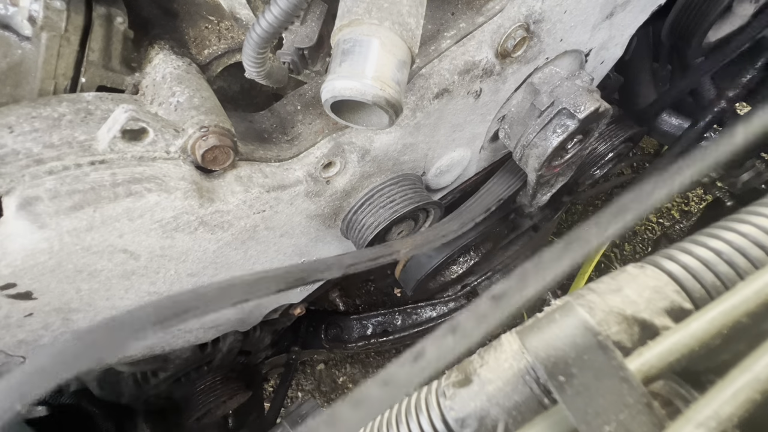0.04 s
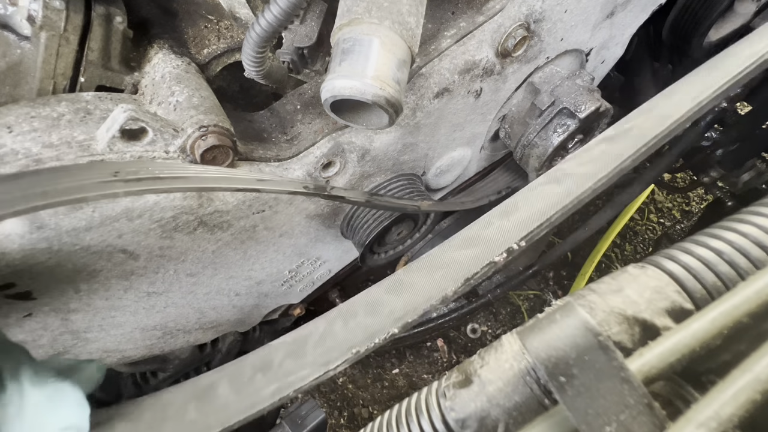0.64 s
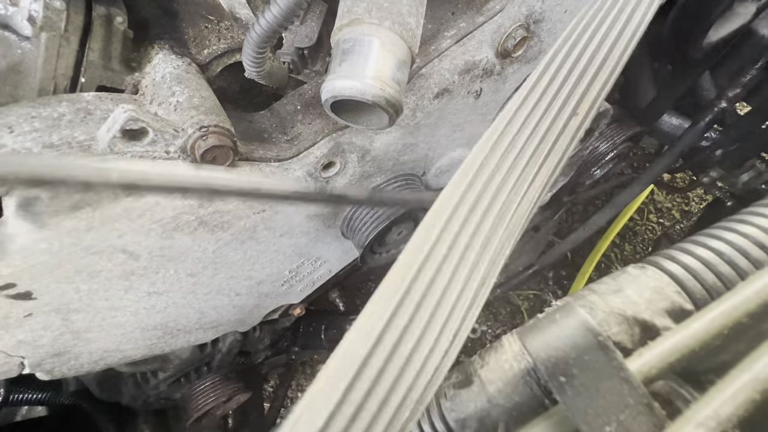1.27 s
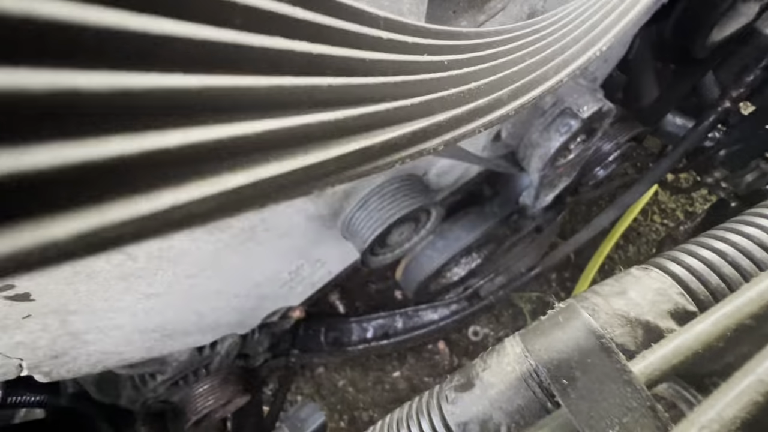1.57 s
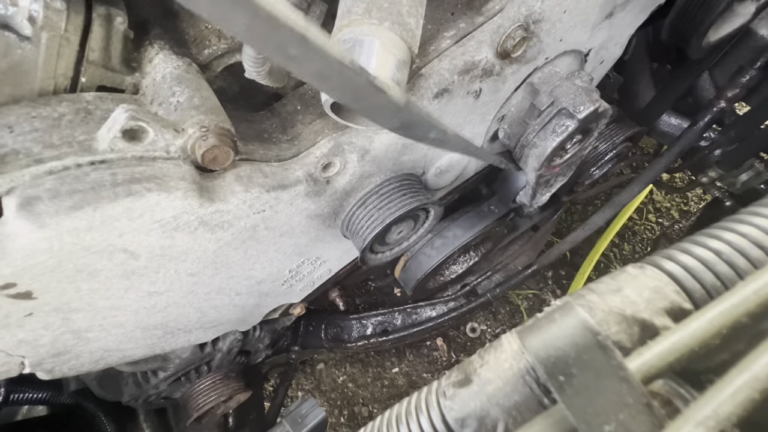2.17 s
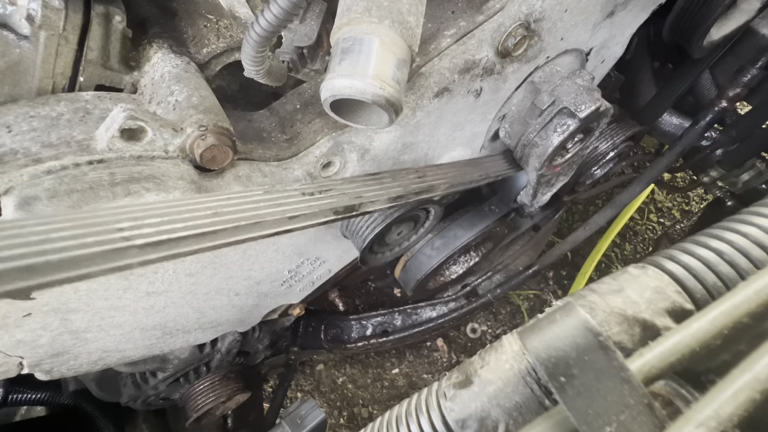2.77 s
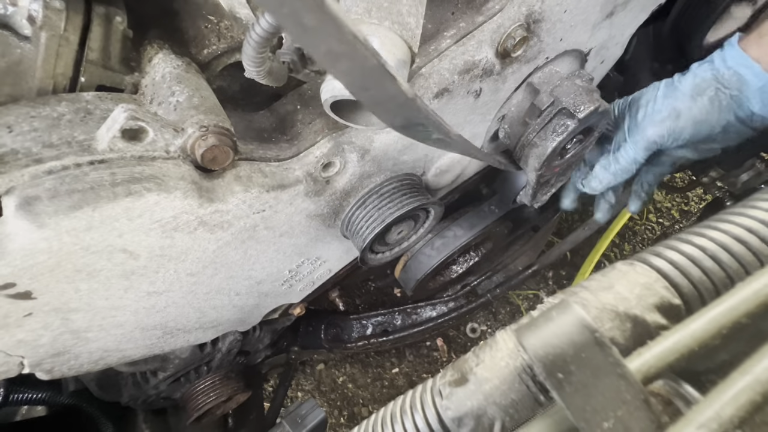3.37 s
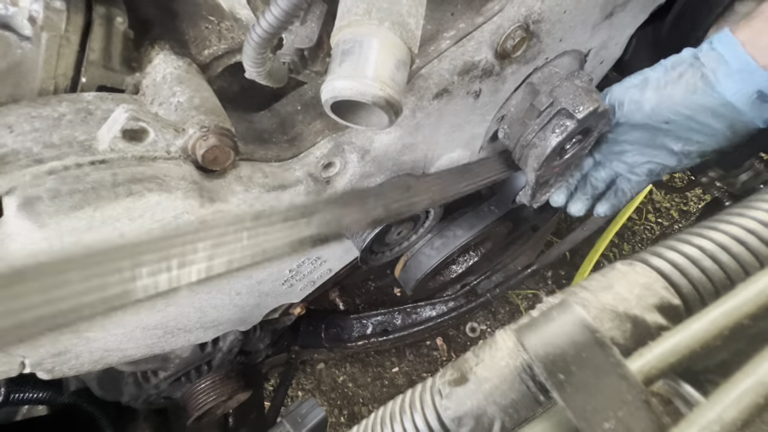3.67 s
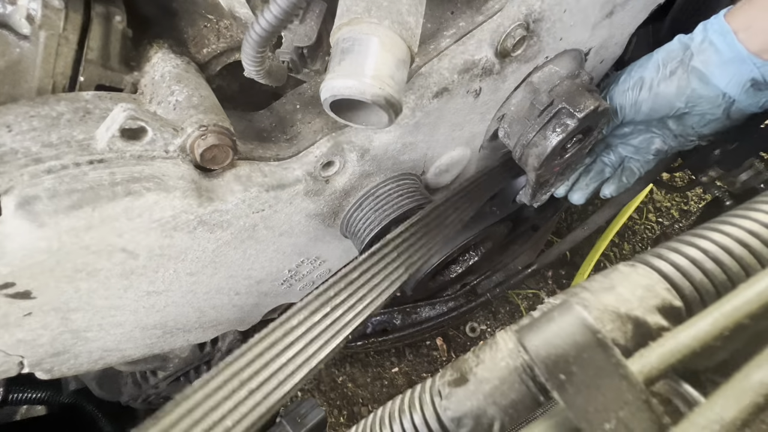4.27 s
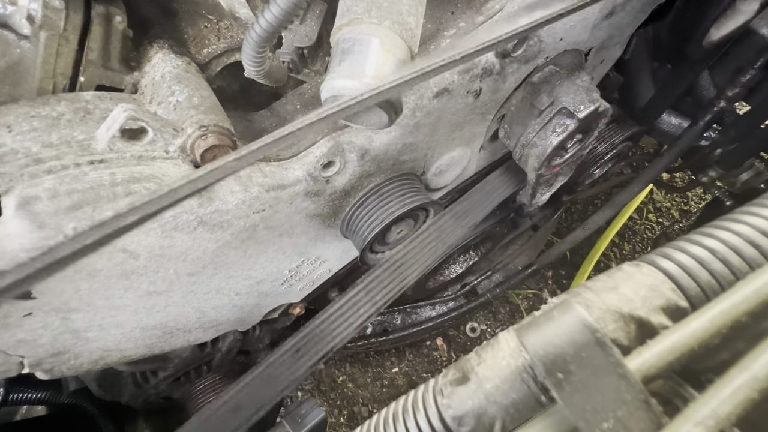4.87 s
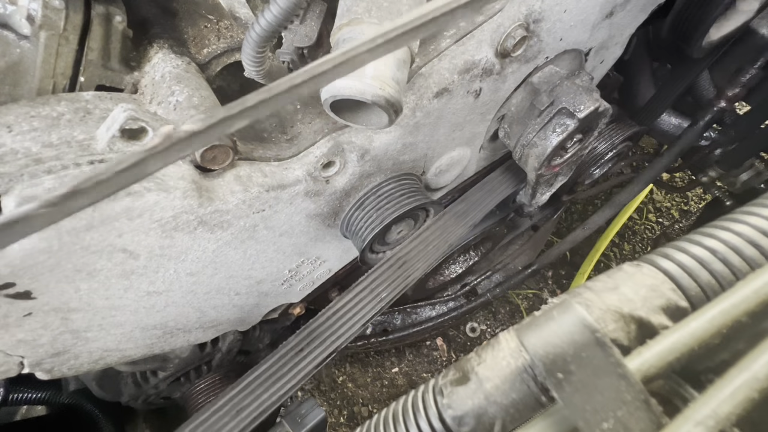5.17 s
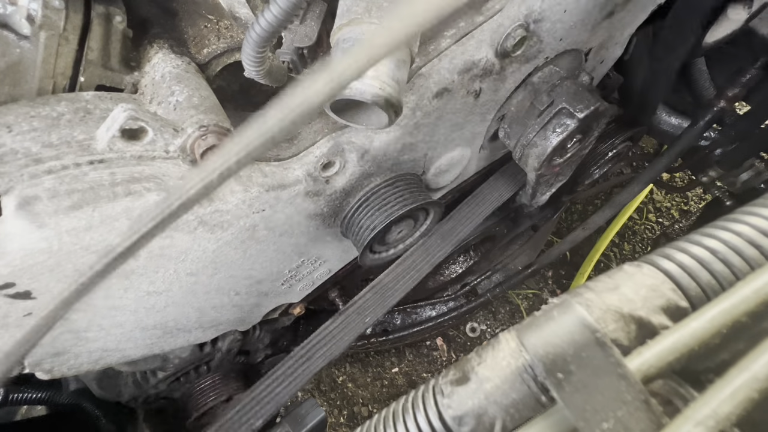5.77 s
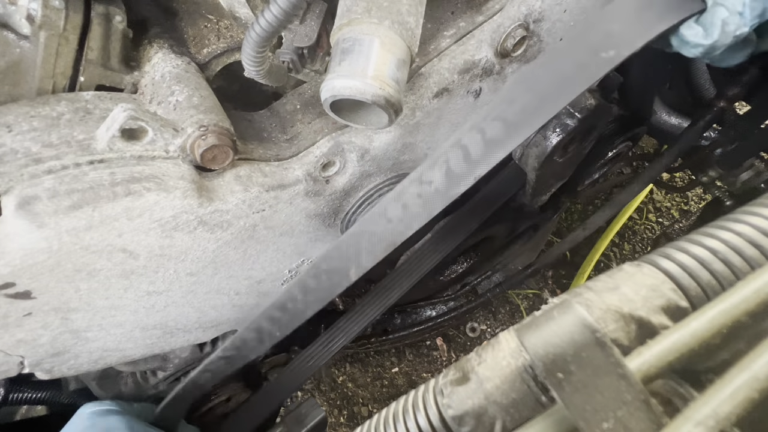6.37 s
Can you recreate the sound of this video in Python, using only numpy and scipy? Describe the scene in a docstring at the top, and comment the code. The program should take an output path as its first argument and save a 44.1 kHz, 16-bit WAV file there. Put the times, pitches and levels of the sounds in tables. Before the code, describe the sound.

Close rustling and scraping of a rubber belt handled by a gloved hand, with scattered flaps and ticks against engine metal.

```python
"""Threading a rubber belt

A gloved hand threads a ribbed rubber belt over the pulleys of a stopped engine, close to a phone
in a garage. The loose length of belt slaps and swings briefly and knocks a pulley. Its ribs tick
over metal edges, and the rubber scrapes and squeaks as it sticks and slips. Under it all lie
the rumble of handling, the rustle of the glove and a faint room hum with hiss."""
import sys
import numpy as np
from scipy import signal
from scipy.fft import rfft, irfft, next_fast_len
from scipy.io import wavfile
from scipy.ndimage import uniform_filter1d

SR = 44100
rng = np.random.default_rng(int(sys.argv[2]) if len(sys.argv) > 2 else 0)


def unload_wav(signal):
    """Save mono or channel-first audio to the path in sys.argv[1] as 16-bit WAV at rate SR, clipped to [-1, 1]."""
    wavfile.write(
        sys.argv[1],
        SR,
        np.round(np.clip(np.atleast_2d(signal).T, -1, 1) * 32767).astype(np.int16),
    )


N = 283563
TIME = np.arange(N) / SR
FFT_SIZE = next_fast_len(N, True)
FREQS = np.fft.rfftfreq(FFT_SIZE, 1 / SR) + 1e-3

# Levels compare rows within a table. A ring time (t60) is the time to fade by 60 dB.
# A phase gap is how far a wave is out of step between the left and right microphones.
# slaps of the belt: (time [s], level [dB], pitch about 4 ms in [Hz], steepness of the pitch fall,
# phase gap [rad], left minus right [dB])
SLAPS = [(1.005, -28.5, 432, 0.058, 2, 2.5), (1.196, -46, 412, 0.34, 2, 2),
         (1.403, -23.5, 433, 0.59, 3, -0.5), (1.57, -28, 542, 0.51, 3.5, 0),
         (1.5757, -28, 295, 0.41, 4, -3.5), (1.6474, -36.5, 353, 1, 2.5, -2.5),
         (3.112, -42.5, 434, 0.42, 1.58, -2), (3.252, -52, 395, 0.35, 2, 0), (3.317, -51, 423, 0.65, 1, -5),
         (3.36, -45.5, 594, .3, 4, -2), (3.411, -49, 450, 0.099, 3, 5),
         (4.1141, -23.5, 440, 0.99, -2.5, 1.5)]
# swings of the loose belt: (time [s], length [s], level [dB], lower note [Hz], upper note [Hz],
# upper over lower [dB], phase gap of the lower note [rad])
SWINGS = [(0.692, 0.015, -49.5, 352, 488, -12, 1), (0.777, 0.027, -54, 266, 387, -3, 0.5),
          (0.99, 0.021, -30.5, 418, 604, -14, 2), (1.01, 0.01, -36.5, 250, 410, 7, -1.5),
          (1.021, 0.03, -31, 252, 417, -4, -1.1), (1.05, 0.019, -41.5, 211, 433, 3, 1),
          (1.073, 0.031, -45, 197, 367, 5.5, 0.5), (1.194, 0.023, -44, 255, 404, 5.5, 0.5),
          (1.402, 0.044, -30, 158, 385, -4, .5), (1.411, 0.034, -27.5, 226.5, 470, -13, 2.5),
          (1.45, 0.023, -41.5, 180, 308, -1, 1.5), (1.571, 0.032, -29, 185.4, 388, -9, 1.2),
          (1.647, 0.023, -30, 168, 244, -21, 0.6), (1.796, 0.0174, -36, 280, 430, -3.5, -1.6),
          (3.108, 0.029, -43.5, 266, 430, -10, 0.7), (3.283, .016, -48, 315, 480, -10, 1),
          (3.363, .024, -40, 257, 647, -5, 1), (4.129, 0.013, -28.5, 268, 443, -10, -1.1),
          (4.164, 0.016, -38, 169, 419, 4, 2.2), (4.177, 0.018, -33.5, 247, 407, -11, -1.7),
          (4.378, 0.031, -36.5, 264, 405, -2, 0.7), (4.415, 0.015, -35.5, 400, 530, -4.5, -2.5),
          (4.432, .016, -28, 440, 562, -8.5, -3), (4.443, 0.028, -38.5, 418, 587, -3, -3),
          (5.384, .028, -55, 310, 403, -4, 1), (6.009, 0.027, -47.5, 265, 415, -12, 1)]
# knocks on a pulley: (time [s], level [dB], centre of the blow [Hz], pitch factor, ring time factor)
KNOCKS = [(1.305, -44, 850, 0.95, 0.98), (2.114, -35.5, 900, 1.06, 0.5), (3.128, -41, 1400, 1, 0.76),
          (3.37, -44, 1100, 0.92, 0.55), (3.404, -38, 800, 1.015, 1.22), (3.738, -25, 371, 0.98, 0.68),
          (3.8179, -28, 420, 0.99, 0.8), (3.935, -41, 850, 0.97, 0.93), (4.449, -34, 700, 1.15, 0.34),
          (4.462, -37, 1000, 1.01, 1.1), (4.9, -55, 1080, 0.96, .5), (5.08, -60, 990, 1.2, 0.6),
          (5.465, -65, 450, 0.81, .4), (5.927, -36, 1000, 0.94, 0.57), (5.943, -31.5, 830, 0.98, 0.67),
          (6.01, -41, 900, 0.91, .4), (6.068, -42, 790, 0.91, 0.59), (6.24, -50, 590, 1.26, 0.34)]
# natural notes of the pulley and its bracket: (pitch [Hz], level [dB], ring time [s], phase gap [rad])
PULLEY_NOTES = [(258, -27, 0.083, -5), (479, -4, 0.16, 1.26), (556, 9.5, 0.008, -1.5),
                (657, -21, 0.51, 3.5), (797, -7, 0.14, 7.5), (821, -14.5, 0.4, 6), (880, -21.5, 0.45, 1.4),
                (1048, -6.5, 0.051, 5), (1390, -16, 0.08, 2.5), (1710, -22, 0.08, 6.5),
                (5440, -7, 0.025, -2)]
# flicks of small metal edges: (time [s], level [dB], pitch [Hz], ring time [s])
PINGS = [(0.754, -39, 2560, 0.009), (3.256, -35.5, 5620, 0.0086), (3.8155, -22.5, 5580, 0.0086),
         (4.0204, -28.5, 3950, 0.018), (4.1152, -8.5, 2830, 0.0086), (5.552, -41, 5300, 0.01),
         (5.617, -41, 6800, 0.011)]
# squeaks of rubber: (time [s], length [s], level [dB], pitch [Hz])
SQUEAKS = [(1.736, 0.0095, -39, 2140), (1.762, 0.013, -45, 2040), (1.779, 0.016, -38, 1950),
           (1.777, .014, -42, 4300), (1.785, 0.014, -44, 3050), (4.414, 0.031, -44.5, 2650),
           (4.415, 0.035, -45.5, 1910), (4.435, .026, -53, 2280), (4.48, 0.034, -53, 2800),
           (4.552, .025, -55.5, 2600), (5.679, 0.041, -54, 2780)]
# ticks of ribs and glove: (time [s], level [dB], brightness [dB], fade time of the crack [s])
TICKS = [(0.754, -53, -1, .0017), (1.0614, -40, -7.5, 0.002), (1.16, -32.5, -3, 0.0015),
         (1.33, -42, -2, 0.0017), (1.341, -41, 0, 0.0012), (1.351, -47, 3, 0.0012),
         (1.402, -29, -18, .0012), (1.569, -39, -17, 0.0013), (1.6472, -33, -10.5, 0.00045),
         (1.711, -43, -14, 0.00076), (1.74, -46, -5, .001), (1.754, -48, -9, .001), (1.772, -45, -5, .0008),
         (1.784, -40, -4, .001), (1.7937, -31.5, -15.5, 0.0015), (1.869, -53, 16, 0.0025),
         (1.899, -60, 16, .001), (1.936, -66, 13, .0014), (1.946, -52, 13.5, .001),
         (1.974, -54.5, 12.5, 0.0029), (2.029, -63.5, 16, 0.0014), (2.055, -61, 17.5, 0.0021),
         (2.076, -47, -7, .0008), (2.097, -45.5, -6, 0.0011), (2.1486, -55.5, 15.5, 0.0027),
         (2.189, -52, 14, 0.0016), (2.27, -52.5, 12, 0.0022), (3.1098, -43.5, -9.5, 0.0024),
         (3.2517, -31.5, -8, .0018), (3.28, -46.5, -3, .0015), (3.3101, -46.5, 8, .002),
         (3.33, -40, -4, 0.0011), (3.395, -46, 5.5, .0009), (3.588, -52.5, 3, 0.0027),
         (3.613, -51, 4.5, .004), (3.674, -47.5, 7, 0.0014), (3.693, -42.5, -4, 0.0026),
         (3.734, -33, 2.5, 0.0015), (3.8147, -32, -1.5, 0.0017), (3.931, -41.5, -2.5, 0.0016),
         (4.0041, -49, 15, 0.0012), (4.0183, -38.5, 6.5, 0.0017), (4.059, -38.5, -8, 0.0018),
         (4.066, -48, 1, .001), (4.1123, -33.5, 2.5, 0.0013), (4.124, -35, -23, .0017),
         (4.155, -38.5, -6, 0.0022), (4.159, -41, -9, 0.002), (4.17, -38.5, -16, 0.0023),
         (4.36, -58, 9, 0.0019), (4.3788, -48, -25, 0.0014), (4.547, -47.5, 3, 0.0021),
         (5.068, -58.5, 11.5, 0.0025), (5.55, -52.5, 0, 0.00054), (5.618, -62, 0, .0007),
         (5.776, -51.5, 10, 0.0025), (5.789, -48.5, 7, 0.0017), (6.008, -47, -13, .002),
         (6.064, -51, -3, .001), (6.124, -55, 1, .001), (6.299, -57, -9, .002)]
# short slips on metal: (time [s], length [s], rasp level [dB], rasp pitch [Hz], hiss level [dB])
SCRAPES = [(0.128, 0.085, -64, 1680, -65), (0.986, 0.031, -44, 1140, -54.5),
           (1.164, 0.015, -47.5, 1220, -52), (1.303, 0.03, -50, 930, -51.5),
           (1.57, 0.0098, -32, 1190, -42.5), (1.646, 0.009, -41, 990, -43.5),
           (1.698, 0.015, -47.5, 1380, -47), (1.741, 0.035, -46.5, 1100, -43),
           (1.773, 0.022, -45, 1300, -48.5), (1.863, 0.035, -50.5, 2740, -51),
           (2.112, 0.021, -49.5, 910, -49.5), (2.13, 0.032, -75, 3500, -58), (2.19, 0.024, -69, 3500, -48),
           (2.45, 0.079, -59.5, 2000, -60), (3.107, 0.0096, -46.5, 1090, -56),
           (3.131, 0.029, -47.5, 1430, -52), (3.31, 0.015, -44, 1000, -47.5),
           (3.358, 0.0177, -42.5, 950, -60), (3.395, 0.019, -46.5, 920, -54.5),
           (3.935, 0.016, -45.5, 910, -58.5), (4.1152, 0.0041, -23, 900, -61),
           (4.159, 0.02, -39, 1960, -55), (4.41, 0.031, -48, 1320, -61), (4.439, 0.023, -47, 710, -65),
           (5.348, 0.082, -58.5, 955, -60), (5.933, 0.032, -44, 880, -58), (6.008, .012, -56, 700, -65),
           (6.067, .014, -55, 640, -63), (6.24, 0.058, -71, 525, -65.5)]
# where the engine parts ring along with ticks and slips: (pitch [Hz], width [Hz], boost [dB])
ENGINE_RESONANCES = [(870, 148, 13.5), (1057, 78, 2.5), (1410, 14, 10), (2030, 250, 4), (2900, 730, 2.5),
                     (3760, 420, 5.5), (5460, 150, 1), (6840, 290, 1), (11800, 4700, -1)]
# how hard the belt is handled: (time [s], level [dB])
HANDLING_FORCE = [(0, -53.5), (0.85, -53.5), (1.1, -45), (1.3, -50), (1.45, -47), (1.75, -43), (1.9, -52.5),
                  (2.45, -57.5), (2.7, -67.5), (3.1, -66.5), (3.3, -55), (3.6, -52.5), (4.15, -50),
                  (4.3, -51), (4.5, -47), (4.82, -64.5), (5.1, -62.5), (5.75, -66), (5.98, -55), (6.4, -56)]
# thrums of the tight belt: (time [s], length [s], level [dB])
THRUMS = [(5.847, 0.21, -52), (6.07, 0.082, -50), (6.195, .17, -49.5)]
# pulls that drag the belt along: (time [s], length [s], level [dB], extra level for the edge [dB])
PULLS = [(0.092, 0.12, -64.5, 8), (0.758, 0.013, -55, -29), (0.898, 0.092, -54, -1),
         (1.011, 0.096, -45, -14), (1.398, 0.13, -51.5, -1), (1.659, 0.12, -46, -3),
         (1.923, 0.35, -69.5, 5.5), (2.414, 0.077, -56.5, -4), (3.008, 0.044, -60, 1), (3.11, 0.16, -58, 2),
         (3.239, 0.2, -47.5, -12.5), (3.572, 0.14, -52.5, -8.5), (3.724, 0.092, -46.5, -7),
         (3.95, 0.21, -49, -10.5), (4.136, 0.028, -50.5, -9), (4.411, 0.14, -48.5, -7.5),
         (4.88, 0.02, -73, 10.5), (5.059, 0.02, -69.5, 11), (5.369, 0.1, -57.5, -6),
         (5.667, 0.037, -72.5, 15), (5.882, 0.2, -58.5, -0.5), (6.107, 0.22, -59.5, -4.5)]
# shifts of the grip: (time [s], length [s], level [dB], treble tilt [dB per octave])
RUSTLES = [(0.0, 0.22, -64.5, 1.5), (0.326, 0.17, -73, 12), (0.553, 0.11, -62.5, 11),
           (0.892, 0.088, -58.5, 1), (1.057, 0.092, -56, 1), (1.18, 0.044, -55, -0.5),
           (1.45, 0.14, -53.5, -2.5), (1.648, 0.05, -54, 0), (1.913, 0.091, -56, -0.5),
           (2.037, 0.16, -52, -4), (2.23, 0.17, -60, 2), (2.506, 0.18, -62.5, 4.5),
           (2.811, 0.082, -60.5, 2), (2.89, 0.035, -55, 3), (2.994, 0.031, -58, 1),
           (3.113, 0.069, -56, -1.5), (3.424, 0.45, -63.5, -1.5), (4.47, 0.086, -59.5, 2),
           (4.69, 0.066, -66.5, -5), (4.837, 0.38, -62, 9.5), (5.424, 0.27, -58.5, 5),
           (5.863, 0.076, -55, 2), (5.995, 0.29, -63.5, -4.5), (6.214, .06, -63.5, 2)]

# tone colours, the strength of each noise from bass to treble: (frequency [Hz], level [dB])
RUMBLE_COLOUR = [(20, -67), (50, -30), (80, -9), (115, 8), (160, 2.5), (240, -4), (330, -22), (700, -43)]  # the held belt
BODY_COLOUR = [(130, -30), (240, 5), (380, -0.5), (490, 0.5), (620, -13), (810, -12), (1100, -12),
               (1500, -47), (3000, -31)]  # the drone of the belt's body
RASP_COLOUR = [(300, -7.5), (700, 9.5), (1100, -2), (1500, 4.5), (2200, -0.5), (2900, 3.5), (3600, -2.5),
               (4600, -6.5), (7000, -23), (16000, -55)]  # the belt's rubbing edge
HISS_COLOUR = [(1500, -24), (3000, 3), (3900, 4), (5200, 3), (6500, 2.5), (8500, 4.5), (11000, 2.5),
               (13200, 5.5), (16000, -7)]  # fine rubbing of belt and glove
CRACK_COLOUR = [(1500, -33.5), (3000, -3.5), (3900, 3), (6500, 3), (8500, 4.5), (11000, 6.5), (13200, 7.5),
                (16000, 2.5)]  # the treble of a tick
ROOM_COLOUR = [(20, -32.5), (60, -12), (90, -20), (120, -5), (170, -12), (300, -24.5), (490, -9.5),
               (700, -18.5), (1300, -19), (2300, -18), (3500, -8.5), (5000, -19), (13000, -19),
               (16000, -31.5)]  # room noise and microphone hiss

# how alike the two microphones hear the belt: (frequency [Hz], likeness [1 same, -1 opposite])
BELT_LIKENESS = [(60, 0.6), (160, 0.83), (300, 0.42), (550, -0.06), (1000, -0.5), (2500, -0.15),
                 (4500, 0.21), (16000, -0.11)]
# how alike they hear the room: (frequency [Hz], likeness [1 same, -1 opposite])
ROOM_LIKENESS = [(60, 1), (300, 1), (700, 0.19), (1500, -0.16), (3500, 0.035), (6000, -0.42), (16000, 0.39)]
# the left microphone is nearer the pulleys: (frequency [Hz], left minus right [dB])
STEREO_BALANCE = [(60, -2.5), (180, -2.5), (330, -1), (600, 2), (1200, 2.5), (3000, 3), (6000, 4),
                  (16000, 4.5)]


def slaps(low_hz=170, arrival_s=0.0046, rise_s=0.003, settle_s=0.016, fade_cycles=4.94, rough=0.17):
    """High notes travel faster along a bending belt, so a slap falls in pitch and dies at once."""
    out, t = np.zeros((2, N)), TIME[:int(.06 * SR)]
    for s, db, pitch_hz, fall, phase_gap, left_db in SLAPS:
        age = (np.minimum(t, settle_s) + 0.00046) / arrival_s
        hz = low_hz + (pitch_hz - low_hz) * age ** -fall
        wobble = uniform_filter1d(rng.standard_normal(N // 2), size=100)[:len(t)] * 10
        attack = rise(t, rise_s) ** 1.24
        decay = np.exp(-2 * (t * pitch_hz / fade_cycles) ** 1.72)
        wave = attack * decay * np.exp(2j * np.pi * np.cumsum(hz * (1 + rough * wobble)) / SR)
        # one face of the belt pushes air as the other pulls, so left and right are out of step
        lag = phase_gap * (np.minimum(hz, pitch_hz) / pitch_hz) ** 0.86
        pair = np.imag([wave, wave * np.exp(1j * lag)]) * undb(panned(left_db))
        strength = np.sqrt(np.sum(pair ** 2) / (2 * 0.059 * SR))
        add(out, s, pair * undb(db) / strength)
    return out


def swings(gain_db=4, rough=0.088, upper_gap_rad=2.33):
    """The belt between hand and pulley swings on two notes until the rubber lies down and stops."""
    out = np.zeros((2, N))
    for s, length, db, lower_hz, upper_hz, upper_db, phase_gap in SWINGS:
        t = TIME[:int(length * SR)]
        wobble = np.interp(t * 200, np.arange(40), rng.standard_normal(40))
        uneven_time = t + rough * np.cumsum(wobble) / SR
        lower = stereo_sine(lower_hz, uneven_time, phase_gap)
        upper = stereo_sine(upper_hz, uneven_time, upper_gap_rad)
        swell = np.sin(np.pi * t / length) ** 0.39
        add(out, s, (lower + undb(upper_db) * upper) * swell * undb(db + gain_db))
    return out


def thuds(hz=158, gain_db=-13, t60=0.12, rise_s=0.0068):
    """After each slap the whole loose length shudders briefly on its lowest note."""
    out, t = np.zeros((2, N)), TIME[:SR // 5]
    for (s, db, *_), detune in zip(SLAPS, rng.uniform(-0.084, 0.056, len(SLAPS))):
        ring = np.sin(2 * np.pi * hz * (1 + detune) * t) * rise(t, rise_s) * fade(t, t60)
        add(out, s, ring[None] * undb(db + gain_db))
    return out


def knocks(gain_db=2, focus_db_per_octave=5, contact_s=0.0015, scatter_db=2):
    """The belt lands on a pulley and rings it; rubber lying on the rim shifts and chokes the notes."""
    out, t = np.zeros((2, N)), TIME[:int(.4 * SR)]
    for s, db, centre_hz, tuning, ring_factor in KNOCKS:
        ring = 0
        chances = rng.uniform(-0.5, 1, (len(PULLEY_NOTES), 2))
        for (hz, note_db, t60, phase_gap), (detune, luck) in zip(PULLEY_NOTES, chances):
            note = stereo_sine(hz * tuning * (1 + .01 * detune), t, -phase_gap)
            octaves_away = abs(np.log2(hz / centre_hz))  # a blow favours notes near its centre
            size = undb(note_db + scatter_db * luck - focus_db_per_octave * octaves_away)
            ring = ring + size * fade(t, t60 * ring_factor) * note
        add(out, s, ring * rise(t, contact_s) * undb(db + gain_db))
    return out


def pings(rise_s=0.00015, gap_rad=2.06):
    """A metal edge, flicked by a rib, rings for an instant on one high note."""
    out, t = np.zeros((2, N)), TIME[:SR // 10]
    for s, db, hz, t60 in PINGS:
        add(out, s, undb(db) * stereo_sine(hz, t, -gap_rad) * rise(t, rise_s) * fade(t, t60))
    return out


def squeaks():
    """The rubber catches on a smooth rim and squeaks faintly around one pitch."""
    out, source = np.zeros((2, N)), grains(rate=340, depth_db=-2.5)
    for s, length, db, hz in SQUEAKS:
        add(out, s, burst(source, s, np.hanning(int(length * SR)), hz, band_ratio=1.17) * undb(db))
    return out


def ticks(snap_hz=2720, snap_db=7, treble_db=11, tail_db=-28, tail_s=.008, left_db=1.5):
    """A rib snaps over an edge: a crisp or blunt crack that scatters among the engine parts."""
    snaps, treble, t = np.zeros((2, N)), np.zeros((2, N)), TIME[:int(.06 * SR)]
    source = grains(rate=6700, depth_db=4.0)
    for s, db, bright_db, crack_s in TICKS:
        tail = undb(tail_db) * np.exp(-t / tail_s)
        crack = rise(t, crack_s) * (np.exp(-t / crack_s) + tail)
        hz = snap_hz * 2 ** (.031 * bright_db)  # a harder tick has more treble and snaps higher
        add(snaps, s, burst(source, s, crack, hz, band_ratio=1.81) * undb(db + snap_db))
        add(treble, s, crack[None] * undb(db + bright_db + treble_db))
    return snaps + shimmer(colour(treble * source, CRACK_COLOUR)) * undb(panned(left_db))


def scrapes(rasp_gain_db=-4.5):
    """The belt slips a short way over metal: a quick swell of coarse sticking and slipping."""
    rasp, hiss = np.zeros((2, N)), np.zeros((2, N))
    source = grains(rate=520, depth_db=6) / 2 + crackle(rate=330, scatter_db=4, decay_s=.0006)
    for s, length, rasp_db, hz, hiss_db in SCRAPES:
        start = s - length / 4  # the swell spills a quarter of the length past each end
        swell = np.sin(np.pi * np.linspace(0, 1, int(1.5 * length * SR)) ** .75)
        add(rasp, start, burst(source, s, swell, hz, band_ratio=1.93) * undb(rasp_db + rasp_gain_db))
        add(hiss, start, swell[None] * undb(hiss_db))
    return rasp + shimmer(friction(hiss, HISS_COLOUR, grain_rate=1400, grain_db=2.0))


def handling(rumble_db=-2, body_db=-15, rasp_db=-24):
    """The held belt rumbles and rubs all the while, louder the harder it is handled."""
    force = undb(np.interp(TIME, *np.transpose(HANDLING_FORCE)))
    return (friction(force * undb(rumble_db), RUMBLE_COLOUR, grain_rate=23, grain_db=2.5)
            + friction(force * undb(body_db), BODY_COLOUR, grain_rate=53, grain_db=-2.5)
            + friction(force * undb(rasp_db), RASP_COLOUR, grain_rate=300, grain_db=-2.5))


def thrums(hz=108, octave_db=-16):
    """Pulled tight, the belt thrums like a string on one low, wavering note."""
    force = np.zeros((1, N))
    for s, length, db in THRUMS:
        add(force, s, undb(db) * stroke(length, attack_s=0.025, change_db=0, release_s=0.022))
    phase = 2 * np.pi * np.cumsum(hz * flutter(rate=30, depth_db=.3)) / SR
    return force * (np.sin(phase) + undb(octave_db) * np.sin(2 * phase))


def sliding(body_db=-1, rasp_db=-4, catch_db=-6):
    """The belt is drawn along in uneven pulls: its body drones, its edge rasps and catches."""
    body, edge = np.zeros((1, N)), np.zeros((1, N))
    for s, length, db, edge_db in PULLS:
        force = undb(db) * stroke(length, attack_s=0.013, change_db=1.5, release_s=0.02)
        add(body, s, force)
        add(edge, s, force * undb(edge_db))
    grip = flutter(rate=45, depth_db=2.5)
    catches = crackle(rate=220, scatter_db=4, decay_s=.0006)
    return (colour(catches * edge * undb(catch_db), RASP_COLOUR)
            + friction(body * grip * undb(body_db), BODY_COLOUR, grain_rate=160, grain_db=3.5)
            + friction(edge * grip * undb(rasp_db), RASP_COLOUR, grain_rate=250, grain_db=0.5))


def rustling(crinkle_db=-5.5):
    """The glove shifts on the back of the belt with a fine hiss and scattered dry crackles."""
    force = np.zeros((1, N))
    for s, length, db, _ in RUSTLES:
        add(force, s, undb(db) * stroke(length, attack_s=0.018, change_db=-1.5, release_s=0.026))
    starts, lengths, _, tilts = np.transpose(RUSTLES)
    tilt = np.interp(TIME, starts + lengths / 2, tilts)
    grip = flutter(rate=70, depth_db=2.5)
    snaps = crackle(rate=170, scatter_db=5, decay_s=.0005)
    texture = grains(rate=5700, depth_db=3.0) + undb(crinkle_db) * snaps
    return shimmer(colour(texture * force * grip, HISS_COLOUR), tilt)


def narrow_belt(x, cut_hz=85):
    """So narrow a strip of rubber gives off no deep bass."""
    return signal.sosfilt(signal.butter(3, cut_hz, "highpass", fs=SR, output="sos"), x)


def engine_parts(x):
    """The engine's metal boosts a sound near its own notes, which ring on briefly."""
    boosts = [1 + (undb(db) - 1) / (1 + 1j * (FREQS / hz - hz / FREQS) * hz / width)
              for hz, width, db in ENGINE_RESONANCES]
    return filtered(x, np.prod(boosts, axis=0))


def garage(x, t60=0.14, echo_db=-23, dull_hz=3500, delay_s=.004):
    """The engine bay and the walls add a weak, dull echo."""
    t = TIME[:SR // 2]
    tail = rng.standard_normal((2, len(t))) * fade(t, t60) * (t > delay_s)
    tail /= np.sqrt(np.sum(tail ** 2) / 2)
    tail = signal.sosfilt(signal.butter(1, dull_hz, fs=SR, output="sos"), tail)
    return x + undb(echo_db) * signal.fftconvolve(x, tail, axes=1)[:, :N]


def background(hiss_db=-64, hum_hz=120, hum_db=-70, left_db=4):
    """Steady room noise and microphone hiss, with a hum that wavers in level."""
    noise = colour(spread(rng.standard_normal((2, N)), ROOM_LIKENESS), ROOM_COLOUR)
    hum = np.sqrt(2) * np.sin(2 * np.pi * hum_hz * TIME) * flutter(rate=7.2, depth_db=2.0)
    return (undb(hiss_db) * noise + undb(hum_db) * hum) * undb(panned(left_db))


def grains(rate, depth_db):
    """Tiny catches and releases of rubber: stereo noise with a flickering level."""
    return spread(rng.standard_normal((2, N)) * flutter(rate, depth_db), BELT_LIKENESS)


def friction(force, tone, grain_rate, grain_db):
    """Rubbing: grains as strong as the force, given a tone colour."""
    return colour(grains(grain_rate, grain_db) * force, tone)


def crackle(rate, scatter_db, decay_s):
    """Dry snaps of sticking rubber, at random moments and of uneven size."""
    hits = rng.random(N) < rate / SR
    sizes = undb(scatter_db * np.clip(rng.standard_normal(N), -2, 1.5))
    envelope = signal.lfilter([1], [1, -np.exp(-1 / (decay_s * SR))], hits * sizes)
    return spread(rng.standard_normal((2, N)), BELT_LIKENESS) * unit_power(envelope)


def burst(source, s, shape, hz, band_ratio):
    """A burst of grains around a pitch: the stiffer the contact, the higher."""
    band_hz = [hz / band_ratio, min(hz * band_ratio, SR / 3)]
    bandpass = signal.butter(3, band_hz, "bandpass", fs=SR, output="sos")
    start = int(s * SR)
    piece = source[:, start:start + len(shape)] * shape
    sound = signal.sosfilt(bandpass, np.pad(piece, ((0, 0), (0, SR // 100))))
    energy = np.mean(np.sum(sound ** 2, axis=1))
    return sound * np.sqrt(np.sum(shape ** 2) / energy)


def shimmer(x, tilt=0, rate=90, depth_db=4.5, bands=14):
    """Each narrow treble band flickers in level on its own; tilt is in dB per octave."""
    centres = np.log2(np.geomspace(2500, 14000, bands) / 9000)
    octaves = np.log2(FREQS / 9000)
    out = 0
    for centre, share in zip(centres, np.eye(bands)):
        band = filtered(x, np.interp(octaves, centres, share))
        out = out + band * flutter(rate, depth_db) * undb(tilt * centre)
    return out


def stroke(length, attack_s, change_db, release_s):
    """One move of the hand: the force builds, drifts by change_db, then lets go."""
    t = TIME[None, :int((length + 6 * release_s) * SR)]
    attack = np.minimum(t / attack_s, 1)
    drift = undb(change_db * np.minimum(t / length, 1))
    release = np.exp(-np.maximum(t - length, 0) / release_s)
    return attack * drift * release


def flutter(rate, depth_db):
    """A gain that wanders to a new random value rate times a second."""
    steps = np.clip(rng.standard_normal(N), -2, 2)
    return unit_power(undb(depth_db * np.interp(TIME * rate, np.arange(N), steps)))


def colour(x, tone):
    """Give a sound a tone colour from a table."""
    gain = unit_power(undb(curve(tone)))
    # folding the cepstrum makes the filter ring only after a sound, never before it
    cepstrum = irfft(np.log(gain), FFT_SIZE)
    cepstrum[1:FFT_SIZE // 2] *= 2
    cepstrum[FFT_SIZE // 2:] = 0
    return filtered(x, np.exp(rfft(cepstrum)))


def spread(x, likeness):
    """Turn two unrelated signals into left and right with a given likeness."""
    alike = np.clip(curve(likeness), -.98, .98)
    mid, side = filtered(x, np.sqrt([(1 + alike) / 2, (1 - alike) / 2]))
    return np.array([mid + side, mid - side])


def curve(points):
    """Join (frequency, value) points with lines that run straight on an octave scale."""
    hz, value = np.transpose(points)
    return np.interp(np.log(FREQS), np.log(hz), value)


def filtered(x, gain):
    """Turn each frequency up or down by its own gain."""
    return irfft(rfft(x, FFT_SIZE) * gain, FFT_SIZE)[..., :N]


def stereo_sine(hz, t, gap_rad):
    """A pure note whose right side runs ahead by gap_rad."""
    return np.sin(2 * np.pi * hz * t + np.array([[0], [gap_rad]]))


def rise(t, rise_s):
    """Climb smoothly from 0 towards 1."""
    return 1 - np.exp(-t / rise_s)


def fade(t, t60):
    """Die away by 60 dB every t60 seconds."""
    return np.exp(-np.log(1000) * t / t60)


def unit_power(x):
    """Scale to an average power of 1."""
    return x / np.sqrt(np.mean(x ** 2))


def undb(db):
    """Decibels to gain."""
    return 10 ** (np.asarray(db) / 20)


def panned(db):
    """Split a level difference into left and right dB."""
    return np.array([[1], [-1]]) * db / 2


def add(out, s, sound):
    """Mix a sound in at s seconds."""
    i = max(int(s * SR), 0)
    out[:, i:i + sound.shape[1]] += sound[:, :max(N - i, 0)]


def scene():
    """All the belt's sounds with the garage's echo, over the hum and hiss."""
    loose_belt = narrow_belt(slaps() + swings() + thuds())
    on_metal = knocks() + pings() + squeaks() + engine_parts(ticks() + scrapes())
    in_hand = handling() + thrums() + sliding() + rustling()
    balance = undb(panned(curve(STEREO_BALANCE)))
    return garage(filtered(loose_belt + on_metal + in_hand, balance)) + background()


def record(dry, top_hz=16100):
    """The phone cuts off the highest treble."""
    return signal.sosfilt(signal.ellip(10, .2, 70, top_hz, fs=SR, output="sos"), dry)


dry = scene()
out = record(dry)
unload_wav(out)
```